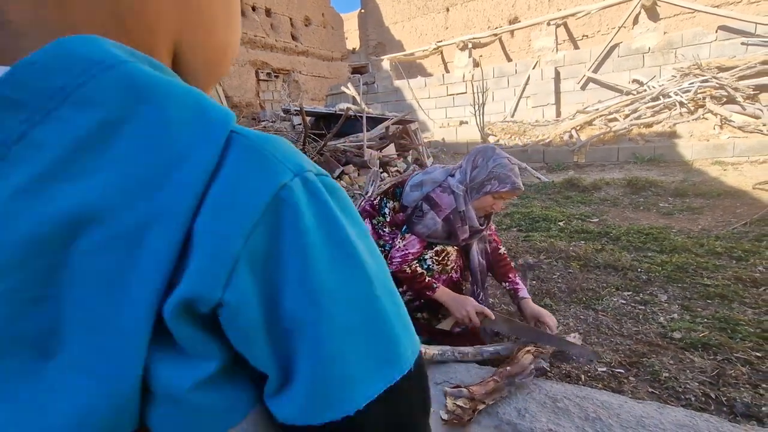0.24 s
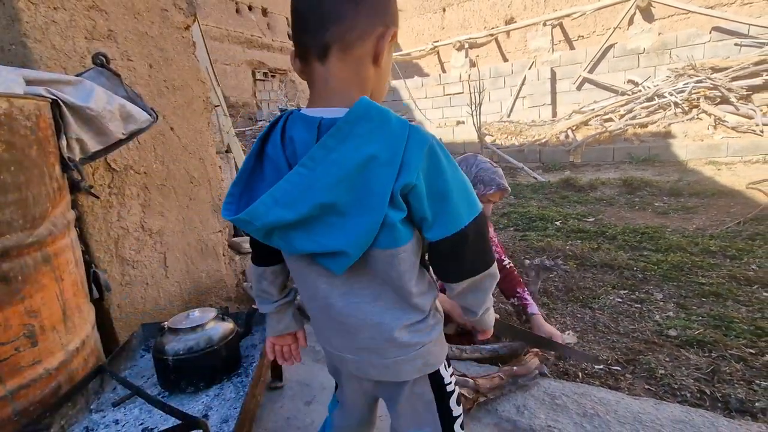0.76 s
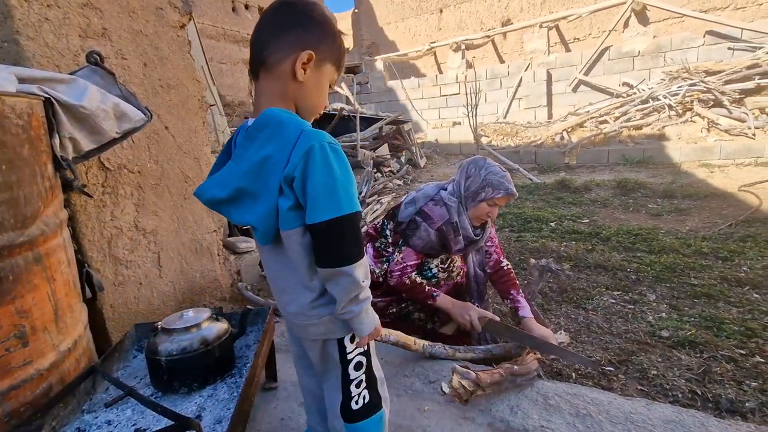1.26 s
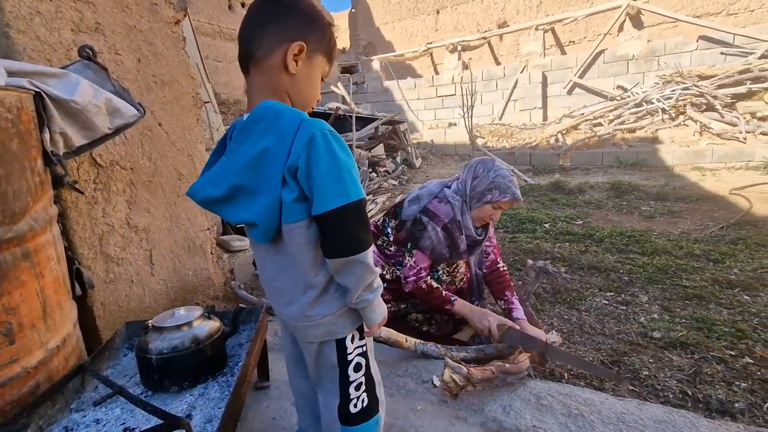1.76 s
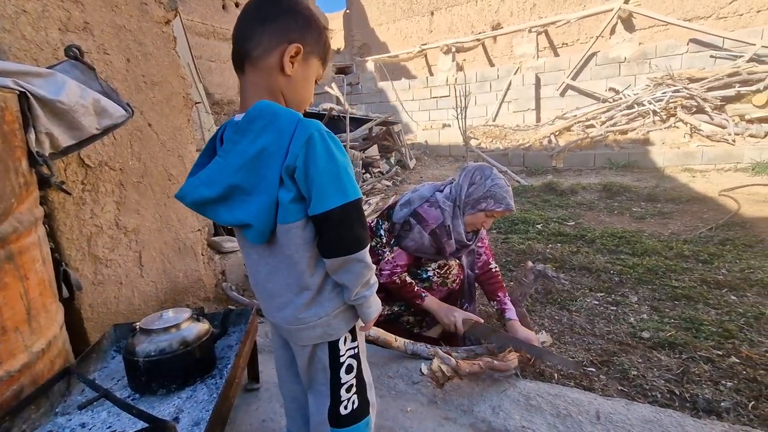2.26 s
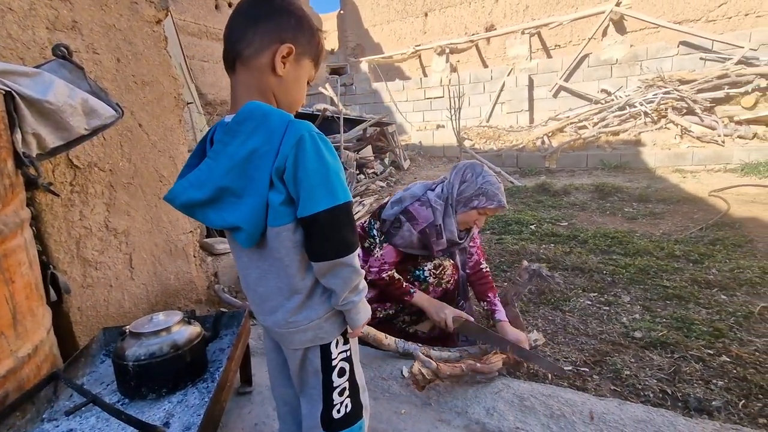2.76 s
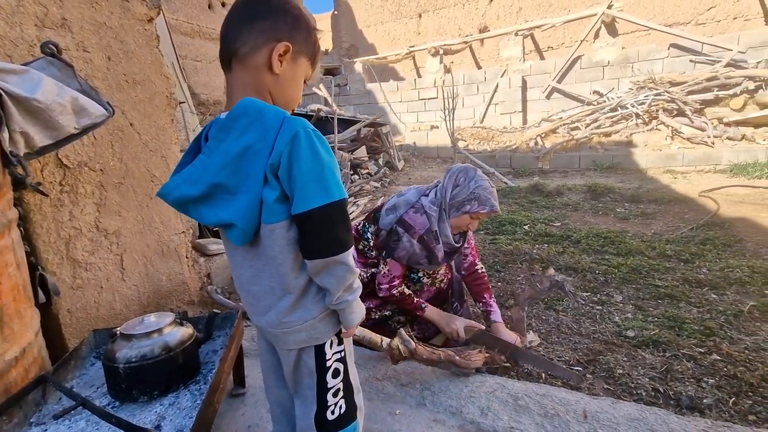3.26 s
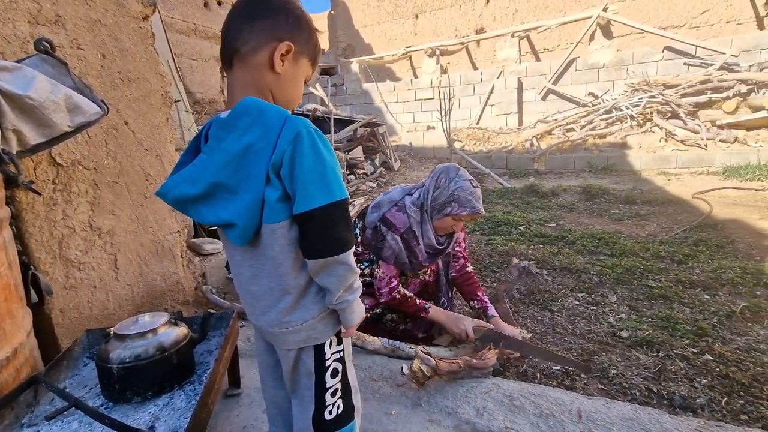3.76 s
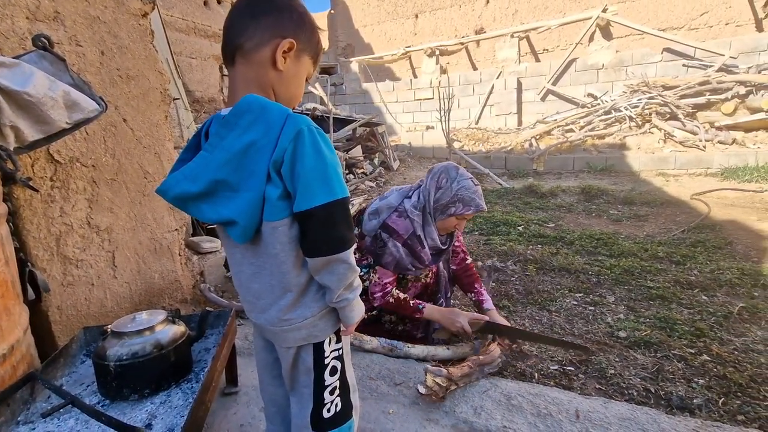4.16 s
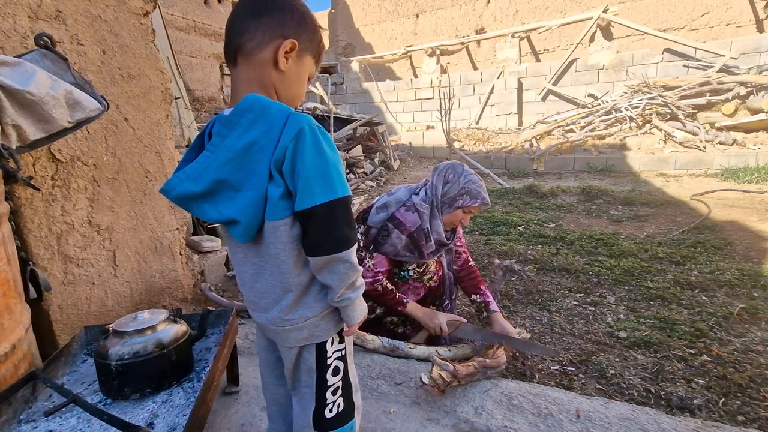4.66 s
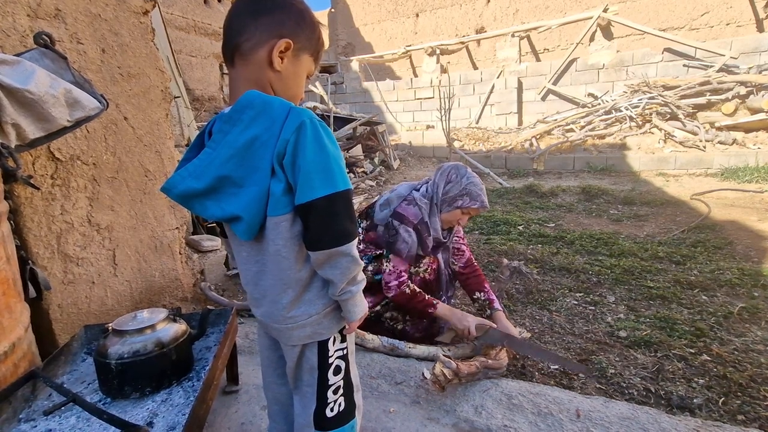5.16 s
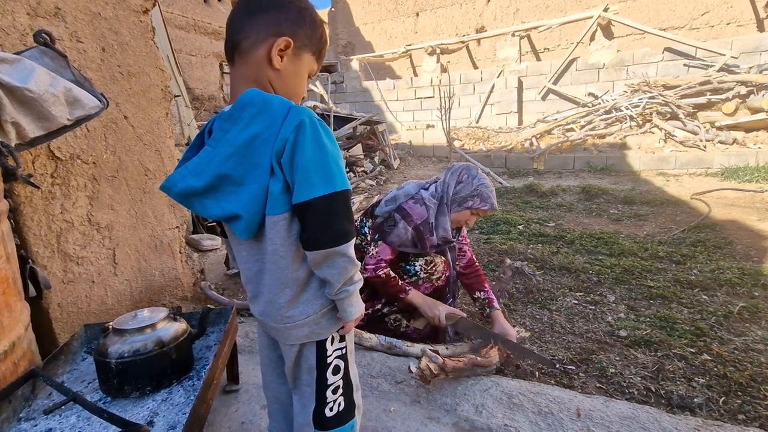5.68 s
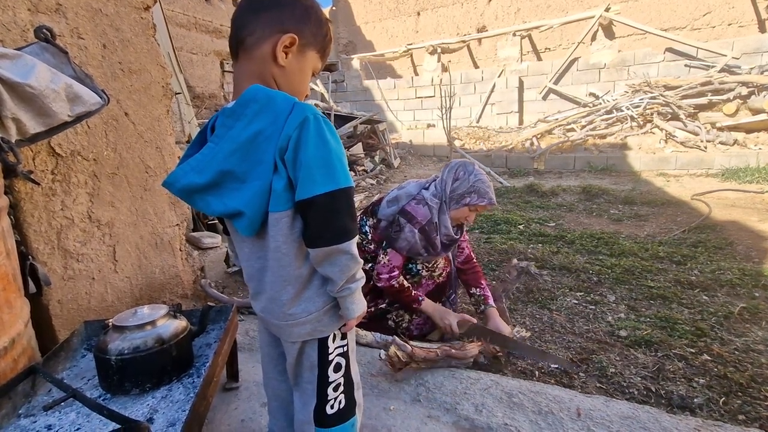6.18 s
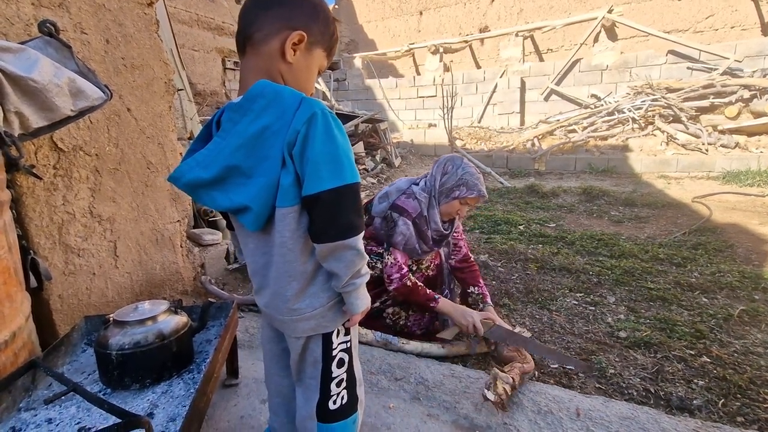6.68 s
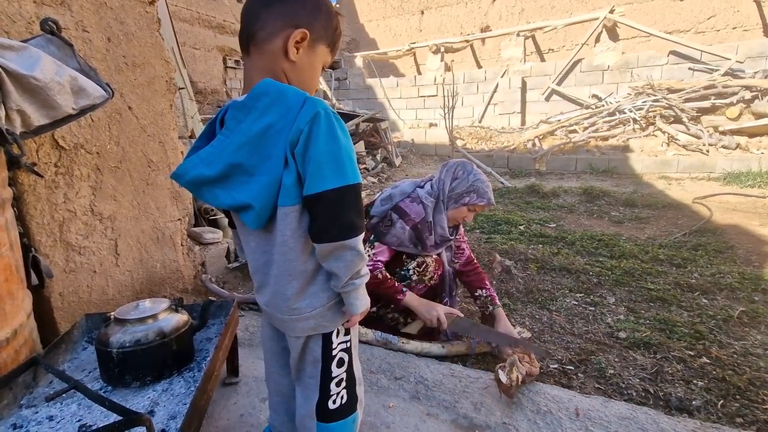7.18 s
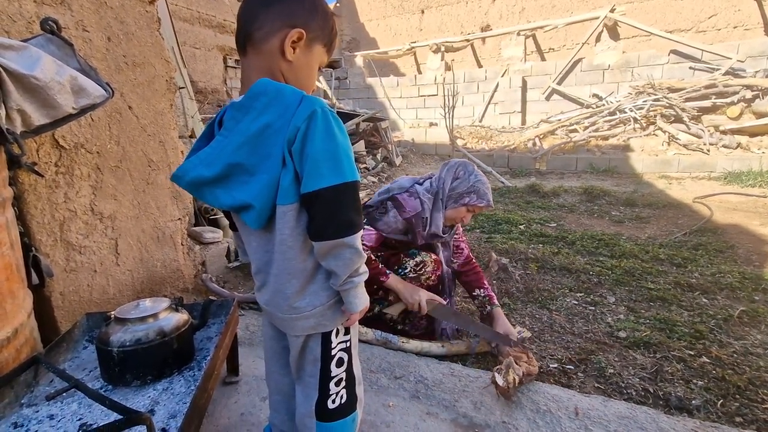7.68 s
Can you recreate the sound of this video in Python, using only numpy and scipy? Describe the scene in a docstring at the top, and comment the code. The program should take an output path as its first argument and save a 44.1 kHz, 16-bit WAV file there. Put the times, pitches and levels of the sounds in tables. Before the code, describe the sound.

Close outdoor hand sawing stops and starts, the wood splintering and bumping on the ground over a faint low drone.

```python
"""A hand saw rasps through a dry branch in three bouts of quick strokes, close by in a yard.
The teeth tear fibres and set blade and branch ringing; the wood cracks and knocks on the ground, and
now and then the blade jams. Two soft footfalls come first; clothes and twigs rustle between bouts.
A low drone hangs under everything; mud walls send a short echo to the two-port stereo microphone."""
import sys
import numpy as np
from scipy import signal
from scipy.fft import rfft, irfft, next_fast_len
from scipy.io import wavfile
from scipy.ndimage import map_coordinates

SR = 44100
rng = np.random.default_rng(int(sys.argv[2]) if len(sys.argv) > 2 else 0)


def waveform_to_disk(signal):
    """Save audio, clipped to [-1, 1], as 16-bit WAV at the path in sys.argv[1]."""
    frames = np.transpose(np.atleast_2d(signal))
    scaled = np.clip(frames, -1, 1) * 32767
    samples = np.round(scaled).astype(np.int16)
    wavfile.write(sys.argv[1], SR, samples)


N = 349713

# saw strokes, pull and push in turn: start/s, length/s, level/dB, depth of the teeth in the cut/0-1
SAW_STROKES = [(0.755, .22, -44, 0.07), (1.115, .13, -39.5, .15), (1.251, 0.21, -37, 0.47),
               (1.471, 0.2, -35, 0.61), (1.664, .17, -38, 0.91), (1.834, .165, -33, 0.71),
               (2.025, 0.18, -38.5, 0.93), (2.188, 0.19, -30.5, 0.7), (2.386, .17, -34.5, 0.67),
               (2.553, .18, -30.5, 0.66), (2.731, .172, -35, 0.87), (2.898, 0.14, -34, 0.57),
               (3.14, 0.11, -44.5, 0.28), (4.435, 0.2, -46.5, 0.63), (4.635, .19, -39, 0.98),
               (4.815, 0.2, -32.5, 0.81), (5.005, 0.19, -34, 0.91), (5.183, 0.19, -32.5, 0.92),
               (5.366, .175, -34, 0.95), (5.531, 0.16, -33.5, 0.78), (5.733, 0.15, -37.5, 0.96),
               (5.869, 0.15, -50, .8), (6.867, 0.17, -52, 0.5), (7.024, 0.27, -36, 0.74),
               (7.262, .218, -36.5, 0.96), (7.471, 0.22, -31.5, 0.77), (7.67, .2, -33.5, 0.87),
               (7.868, 0.16, -30.5, 0.74)]
# resonances of the branch, the blade and its teeth: f/Hz, width/Hz, level/dB
BRANCH_MODES = [(125, 77, -3), (268, 105.2, -1), (430, 110.6, -0.5), (550, 128, 0), (697, 127.7, -5.5)]
BLADE_MODES = [(1015, 164, 9.5), (1170, 47, -7), (1477, 74, 3.5), (1964, 169, 3.5), (2148, 234, -1.5),
               (2716, 67, -2.5)]
TEETH_MODES = [(2950, 310, -4), (3430, 155, 2.5), (4096, 650, -2), (4700, 150, 1.5), (4906, 168, -1),
               (5590, 370, -0.5), (6140, 490, -1), (6870, 410, 0), (7460, 420, -2), (8400, 200, -16)]
# top hiss of tearing wood: f/Hz, level/dB
HISS_SPECTRUM = [(6000, -45.5), (8300, 3), (9500, 1.5), (11000, 0), (12300, 1), (13500, 9), (16000, -5)]
MID_ONLY = np.array([[1], [0]])  # sounds travel as (mid, side) pairs up to the microphone


def amp(db):
    """Decibels to gain."""
    return 10 ** (np.asarray(db) / 20)


def unit(x):
    """Scale to rms 1."""
    return x / np.sqrt(np.mean(x ** 2) + 1e-20)


def along(points, hz):
    """Read (f/Hz, value) points on a log axis."""
    f, v = np.transpose(points)
    return np.interp(np.log(hz + 1), np.log(f + 1), v)


def wobble(rate):
    """A smooth random curve, rate knots a second."""
    knots = rng.standard_normal(int(N * rate / SR) + 4)
    fine = np.arange(0, len(knots) - 1, 1 / 8)
    return np.interp(np.arange(N) * rate / SR, fine, map_coordinates(knots, [fine]))


def filtered(x, response):
    """x through a complex frequency response."""
    n = x.shape[-1]
    m = next_fast_len(n + 2048, real=True)
    return irfft(rfft(x, m) * response(np.fft.rfftfreq(m, 1 / SR)), m)[..., :n]


def coloured(x, spectrum):
    """x through a spectrum: f/Hz, level/dB."""
    return filtered(x, lambda f: amp(along(spectrum, f)))


def ringing(x, modes):
    """x through a bank of resonances: f/Hz, width/Hz, level/dB."""
    return filtered(x, lambda f: sum((-1) ** k * amp(db) * 1j * f * w / (c * c - f * f + 1j * f * w)
                                     for k, (c, w, db) in enumerate(modes)))


def noise(size=N):
    """Two unrelated white noises."""
    return rng.standard_normal((2, size))


def add(track, s, sound):
    """Mix a sound in at time s."""
    part = track[:, round(s * SR):][:, :sound.shape[1]]
    part += sound[:, :part.shape[1]]


def pulses(rate, scatter, spread_db):
    """One pulse for each tooth or snag that catches, unevenly timed and sized."""
    count = np.floor(np.cumsum(rate * np.exp(scatter * wobble(300))) / SR)
    return np.diff(count, prepend=0) * amp(spread_db * np.clip(rng.standard_normal(N), -2, 2))


def tearing(hits, life, bed):
    """Each pulse tears loose a tiny burst of noise, over a steady bed of friction."""
    bursts = signal.lfilter([1], [1, -np.exp(-1 / (life * SR))], hits)
    return unit((unit(bursts) + bed) * noise())


def background():
    """A low wavering drone over the quiet air of the yard."""
    drone_levels = [(0.7, -70.5), (1.52, -53), (3.03, -50), (3.07, -59), (5.37, -44.5), (6.32, -55),
                    (7.16, -45), (7.46, -54.5), (7.5, -46), (7.93, -63)]  # course of the drone: t/s, level/dB
    air_spectrum = [(12, -48), (20, -9), (74, 0), (200, -17.5), (550, -19.5), (1200, -39), (2700, -29.5),
                    (6400, -30), (11000, -36), (13900, -30), (16000, -31)]  # open air: f/Hz, level/dB
    times, db = np.transpose(drone_levels)
    drone_hz = 72 + 1.5 * wobble(9)
    tone = np.sqrt(2) * np.sin(2 * np.pi * np.cumsum(drone_hz) / SR) * MID_ONLY
    rumble_spectrum = [(20, -37.5), (50, -12), (70, 0), (100, -14), (200, -17), (500, -66.5)]
    rumble = unit(coloured(noise(), rumble_spectrum))
    level = amp(np.interp(np.arange(N) / SR, times, db) + 0.69 * wobble(8))
    air = amp(-60.5) * unit(coloured(noise(), air_spectrum))
    return level * (0.63 * tone + 0.67 * rumble) + air


def yard_echo(sound):
    """Mud walls give a short, weak answer."""
    decay_times = [(150, 0.37), (2000, 0.13), (12000, 0.16)]  # reverberation of the yard: f/Hz, t60/s
    hz, t, spectrum = signal.stft(noise(SR // 3), SR, nperseg=256)
    decay = amp(-60 * t / along(decay_times, hz)[:, None])
    tail = signal.istft(spectrum * decay, SR, nperseg=256)[1]
    delayed_tail = np.pad(tail / np.linalg.norm(tail[0]), ((0, 0), (SR // 150, 0)))
    return signal.fftconvolve(sound, delayed_tail, axes=1)[:, :N]


def handling():
    """Clothes, grit and twigs rustle while the branch is shifted."""
    movements = [(-0.2, 0.93, -61, -56), (0.1, 0.21, -65, -48.5), (0.614, 0.58, -72, -53),
                 (1.024, 0.35, -84, -47), (3.0, 0.32, -65, -55.5), (3.273, 1, -75, -55),
                 (3.542, 0.34, -56.5, -61), (3.798, 0.16, -51, -59), (3.962, 0.22, -59.5, -54.5),
                 (4.103, 0.55, -60.5, -57.5), (6.026, 0.34, -67, -69), (6.251, 0.15, -60, -66),
                 (6.516, .2, -64, -63), (6.717, 0.36, -67, -79.5), (6.817, .15, -72.5, -60)]  # each shift: start/s, length/s, shuffle level/dB, rustle level/dB
    shuffle_spectrum = [(53, -55.5), (90, -1.5), (336, -4.5), (551, -8.5), (706, -10), (1030, -16),
                        (1240, -22.5), (1500, -13.5), (1950, -39), (3300, -120)]  # dull rubbing: f/Hz, level/dB
    rustle_spectrum = [(410, -23), (700, -5.5), (1040, -7.5), (1230, -11), (1500, -8.5), (2100, -2),
                       (2700, -5.5), (3280, -1), (6570, -2), (10500, -9), (13300, -3.5), (16000, -8)]  # bright rustling: f/Hz, level/dB
    swell_share, settle_share = 0.27, 0.37  # of a movement's length
    t = np.arange(N) / SR
    rubbing = tearing(pulses(90, scatter=0.43, spread_db=3.5), life=0.005, bed=0.74)
    snagging = tearing(pulses(170, scatter=0.97, spread_db=3), life=0.0039, bed=0.65)
    grit = tearing(pulses(28, scatter=0.9, spread_db=4), life=0.0007, bed=0)
    shuffle = unit(coloured(rubbing, shuffle_spectrum))
    ticks = unit(coloured(grit, rustle_spectrum))
    rustle = unit(unit(coloured(snagging, rustle_spectrum)) + 0.15 * ticks)
    out = np.zeros((2, N))
    for start, length, shuffle_db, rustle_db in movements:
        swell = np.interp((t - start) / length, [0, swell_share, 1 - settle_share, 1], [0, 1, 1, 0])
        out += swell * (amp(shuffle_db) * shuffle + amp(rustle_db) * rustle)
    return out


def steps():
    """Soft shoes give dull thuds."""
    footfalls = [(0.488, -43), (0.537, -35.5)]  # shoes on the ground: t/s, level/dB
    out, t = np.zeros((2, N)), np.arange(8192) / SR
    thud = np.sin(2 * np.pi * 66 * t) + 0.47 * np.sin(2 * np.pi * 125 * t)
    envelope = amp(-60 * t / 0.067) * (1 - np.exp(-t / 0.01))
    for start, db in footfalls:
        add(out, start, amp(db + 9) * thud * envelope * MID_ONLY)
    return out


def knock(db, thump_db, clack_db, scrape_db, rise_s):
    """One blow rings the branch (wood, thump), the blade (clack) and its teeth (scrape)."""
    t = np.arange(4096) / SR
    blow = noise(len(t)) * amp(-60 * t / 0.032) * (1 - np.exp(-t / rise_s))
    branch_ring = ringing(blow, BRANCH_MODES)
    wood = unit(coloured(branch_ring, [(100, -9.5), (300, -4.5), (700, -7.5), (2000, 20)]))
    thump = amp(thump_db) * unit(ringing(blow, [(130.4, 27, 0)]))
    clack = amp(clack_db) * unit(ringing(blow, BLADE_MODES))
    hiss = unit(coloured(blow, HISS_SPECTRUM))
    scrape = amp(scrape_db) * (unit(ringing(blow, TEETH_MODES)) + 0.37 * hiss)
    return amp(db - 18.5) * (wood + thump + clack + scrape)


def knocks():
    """The blade clacks as each push bites and when it jams; the branch bumps and rattles the saw."""
    jams = [(3.005, -27, -2.5), (5.613, -21.5, -11.5), (5.688, -28, -26), (5.917, -26, -5.5),
            (5.997, -24, -7.5)]  # the blade sticks, then catches again: t/s, level/dB, second catch/relative dB
    bumps = [(0.426, -41.5, -24), (1.949, -23.5, -27), (2.079, -27, -18), (2.306, -19.5, -34.5),
             (3.75, -36.5, -28), (4.378, -32, -25), (5.343, -28.5, -5), (5.63, -21, -6.5),
             (5.654, -24, -19), (6.064, -35.5, -12), (6.09, -36.5, -16), (6.533, -26, -5), (6.571, -28, -2),
             (6.618, -37.5, -3)]  # the branch hits the ground: t/s, level/dB, thump/relative dB
    bite_delay_s, recatch_s = 0.0245, 0.029
    out = np.zeros((2, N))
    for start, _, db, _ in SAW_STROKES[1::2]:
        bite = knock(db - 4, thump_db=-13, clack_db=3.5, scrape_db=5.5, rise_s=0.002)
        add(out, start + bite_delay_s, bite)
    for start, db, again_db in jams:
        for at, catch_db in [(start, db), (start + recatch_s, db + again_db)]:
            add(out, at, knock(catch_db, thump_db=-18.5, clack_db=-2, scrape_db=-2, rise_s=0.0024))
    for start, db, thump_db in bumps:
        add(out, start, knock(db, thump_db, clack_db=-14, scrape_db=-14, rise_s=0.0023))
    return out


def cracks():
    """Fibres snap: a very short bright burst, a splinter's pitch and a brief ring of the wood."""
    breaks = [(0.3324, -35, 4140, -7, 0.012), (0.9877, -33.5, 6770, -16.5, .01),
              (1.1429, -8.5, 3680, -38, 0.011), (1.4544, -30.5, 4100, 2, 0.01),
              (1.949, -18, 7400, -7.5, 0.01), (2.3305, -8, 7250, -29.5, 0.004),
              (2.34, -29, 7140, -28, 0.01), (2.3575, -18.5, 6880, -20, .01),
              (2.363, -6.5, 6700, -15.5, 0.033), (2.663, -15.5, 5860, -13.5, .01),
              (2.6776, -7, 3160, -25, 0.016), (2.6846, -13.5, 3240, 2, 0.01),
              (2.9504, -10, 5950, -6.5, 0.02), (2.9569, -11, 8040, -27, .009),
              (2.9908, -18, 6640, -19, 0.018), (3.247, -28.5, 3180, -20, 0.0082),
              (3.6448, -30.5, 6600, -14, 0.016), (3.7505, -29.5, 6890, -9, 0.0079),
              (4.0092, -32, 6100, -25, 0.0165), (5.694, -33, 7000, -18, .011),
              (6.1967, -43.5, 5650, -21, .01), (6.2314, -43, 6210, -27, 0.01),
              (6.535, -24.5, 7420, -28, 0.0093), (6.934, -37, 7540, -25, 0.011),
              (7.221, -23, 7210, -22, 0.019)]  # splintering wood: t/s, level/dB, f/Hz, body/relative dB, t60/s
    snap_spectrum = [(800, -16.5), (2500, 5), (8000, 8), (10000, -15), (16000, -21.5)]
    out, t = np.zeros((2, N)), np.arange(2048) / SR
    attack = (1 - np.exp(-t / 0.0005)) ** 2
    first_break = 1 + 0.13 * np.exp(-((t - 0.0012) / 0.00013) ** 2)
    for start, db, hz, body_db, t60 in breaks:
        decay = amp(-60 * t / t60) + amp(-26 - 60 * t / 0.05)
        burst = noise(len(t)) * attack * decay * first_break
        snap = unit(coloured(burst, snap_spectrum))
        splinter = unit(ringing(burst, [(hz, 1100, 0)]))
        body = amp(body_db + 1) * unit(ringing(burst, [(1510, 260, -0.078), (2000, 270, 0)]))
        sizzle = amp(-6.5) * unit(coloured(burst, HISS_SPECTRUM))
        add(out, start, amp(db - 23.5) * (snap + 0.67 * splinter + body + sizzle))
    return out


def flexing(travel, low_hz, rise):
    """The blade's bending tones glide as its free length shortens and grows."""
    modes = [(1, -9), (2.1, -6), (3.6, -5.5)]  # frequency ratio, level/dB
    phase = 2 * np.pi * np.cumsum(low_hz * (1 + rise * travel)) / SR
    tone = sum(amp(db) * (wobble(45) * np.sin(ratio * phase) + wobble(45) * np.cos(ratio * phase))
               for ratio, db in modes)
    return unit(tone * MID_ONLY)


def tip_echo(sound, travel, near_s, far_s, share):
    """Waves return from the blade's end; the changing path sweeps a comb through the rasp."""
    samples = np.arange(N)
    delay_s = near_s + (far_s - near_s) * travel
    echo = np.array([np.interp(samples - SR * delay_s, samples, channel) for channel in sound])
    return unit(sound + share * echo)


def stiffening(drive, modes, travel, shift):
    """The blade's resonances rise a little as it runs into the cut and its free part shortens."""
    slack, taut = (ringing(drive, [(hz * tuning, width, db) for hz, width, db in modes])
                   for tuning in (1 - shift, 1 + shift))
    return slack * np.sqrt(1 - travel) + taut * np.sqrt(travel)


def arm():
    """Each stroke speeds up and stops: gives speed, blade travel and the force on each saw layer."""
    # pull, then push: moment of top speed/share of the stroke, entry softness, exit softness
    gestures = [(.55, 2.2, 1.49), (.46, 1.5, 1.8)]
    # branch, blade, rasp and hiss against the stroke: level skimming/dB, level deep in the cut/dB
    seating = [(-21, -1.5), (-12, 1.5), (-2.5, 0), (2, -9)]
    skimming_db, deep_db = np.transpose(seating)
    t = np.arange(N) / SR
    speed, forces = np.zeros(N), np.zeros((4, N))
    for k, (start, length, db, depth) in enumerate(SAW_STROKES):
        fastest, entry, leave = gestures[k % 2]
        moving = (t > start) & (t < start + length)
        progress = (t[moving] - start) / length
        swing = np.abs(np.sin(np.pi * np.interp(progress, [0, fastest, 1], [0, 0.5, 1])))
        speed[moving] = swing
        # the force levels off once the teeth are seated; a little is left at the turn
        grip = np.tanh(1.655 * swing ** np.where(progress < fastest, entry, leave)) + 0.025
        layer_db = db + skimming_db + depth * (deep_db - skimming_db)
        forces[:, moving] += amp(layer_db)[:, None] * grip
    # the blade runs out on one stroke and back on the next
    starts = np.sort(np.transpose(SAW_STROKES)[0])
    travel = np.interp(t, starts, np.arange(len(starts)) % 2)
    return speed, travel, forces


def saw():
    """Teeth tear fibres: faster teeth bite more often, deeper teeth shake more wood."""
    speed, travel, forces = arm()
    chips = pulses(110 + 330 * speed, scatter=0.2, spread_db=3)
    torn_fibres = tearing(chips, life=0.0015, bed=1)
    bites = tip_echo(torn_fibres, travel, near_s=0.000944, far_s=0.001936, share=0.26)
    # the set teeth catch on the walls of the cut and jolt the whole branch
    jolts = pulses(70 + 130 * speed, scatter=0.12, spread_db=5)
    catches = tearing(jolts, life=0.0018, bed=0.88) + 0.5 * unit(jolts * MID_ONLY)
    branch_ring = ringing(catches, BRANCH_MODES)
    blade_ring = stiffening(bites + 0.84 * catches, BLADE_MODES, travel, shift=0.02)
    teeth_ring = stiffening(bites, TEETH_MODES, travel, shift=0.012)
    wood = unit(coloured(branch_ring, [(50, -10), (120, -7.5), (800, -9), (2000, 18)]))
    branch = amp(-2.5) * wood + amp(-10) * flexing(travel, low_hz=108.2, rise=1.7)
    blade = amp(-2) * unit(coloured(blade_ring, [(300, 4.5), (800, -6.5), (2600, 6.5), (5000, -9.5)]))
    rasp = amp(-3) * unit(coloured(teeth_ring, [(1000, 11), (2500, 6), (8000, -1.5), (12000, 1.5)]))
    hiss = amp(-2) * unit(coloured(bites, HISS_SPECTRUM))
    pressure = amp(0.4 * wobble(70))
    return pressure * sum(force * layer for force, layer in zip(forces, [branch, blade, rasp, hiss]))


def microphone(pair):
    """Bass reaches both ports alike; the treble differs and is shaded by the housing."""
    likeness = [(30, 0.4), (80, 1), (200, 0.92), (600, 0.78), (750, 0.48), (1020, .93), (1500, 0.41),
                (2000, -0.02), (2850, -0.35), (4200, -0.26), (5000, 0.16), (8000, 0.11), (15000, -0.11)]  # agreement of the two ports: f/Hz, correlation
    balance = [(70, -2.5), (220, 0), (500, -1), (1000, 0), (1400, 5), (1900, 4.5), (2800, 0.5),
               (4000, -7.5), (5000, 0), (6400, -8), (8000, -2.5), (11000, -1), (13800, -7)]  # shading by the housing: f/Hz, left minus right/dB
    angle = lambda hz: np.arccos(np.clip(along(likeness, hz), -1, 1)) / 2
    mid, side = filtered(pair, lambda hz: np.array([np.cos(angle(hz)), np.sin(angle(hz))]))
    shade = lambda hz: amp(np.outer([0.5, -0.5], along(balance, hz)))
    return filtered(np.array([mid + side, mid - side]), shade)


def scene():
    """The work close by, its echo off the walls and the background, all at the microphone."""
    work = saw() + cracks() + knocks() + steps() + handling()
    return microphone(work + amp(-12) * yard_echo(work) + background())


def record(dry):
    """The recorder keeps nothing above its band limit."""
    return filtered(dry, lambda hz: hz < 16200)


dry = scene()
out = record(dry)
waveform_to_disk(out)
```